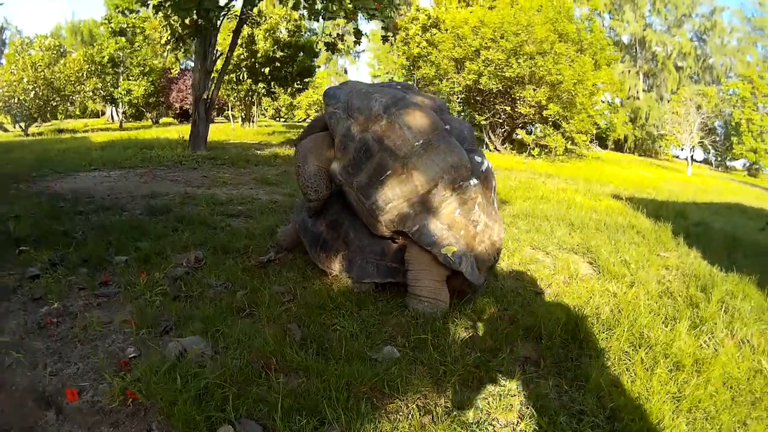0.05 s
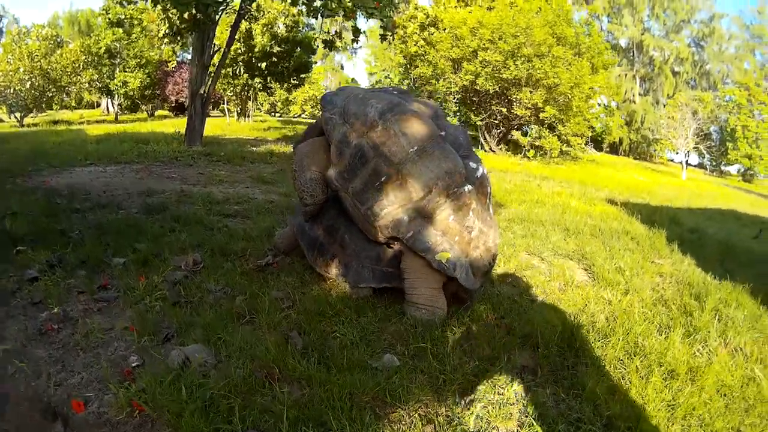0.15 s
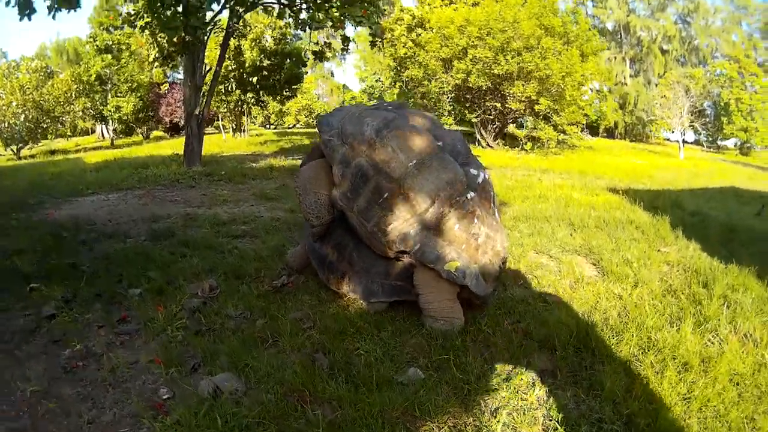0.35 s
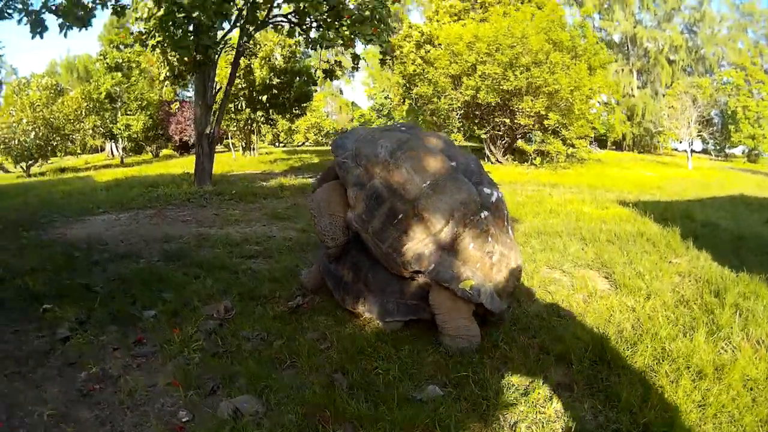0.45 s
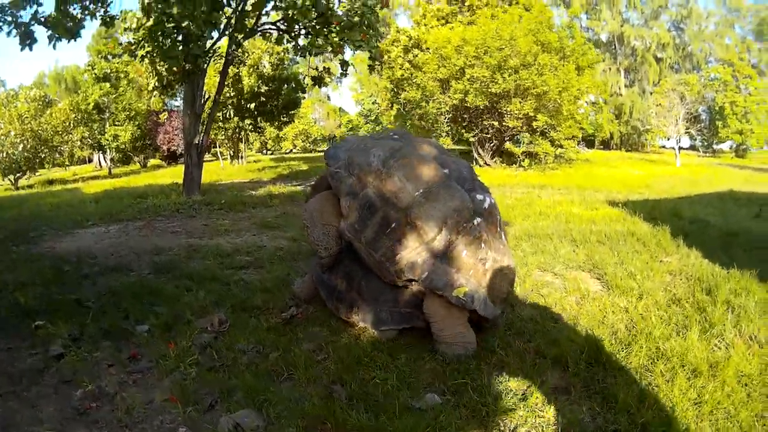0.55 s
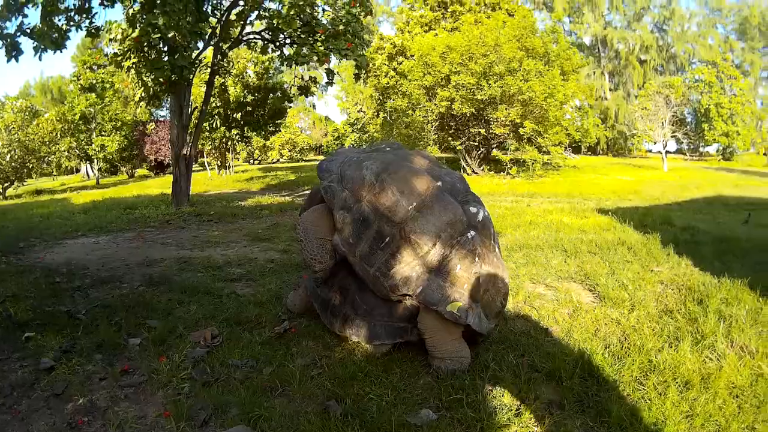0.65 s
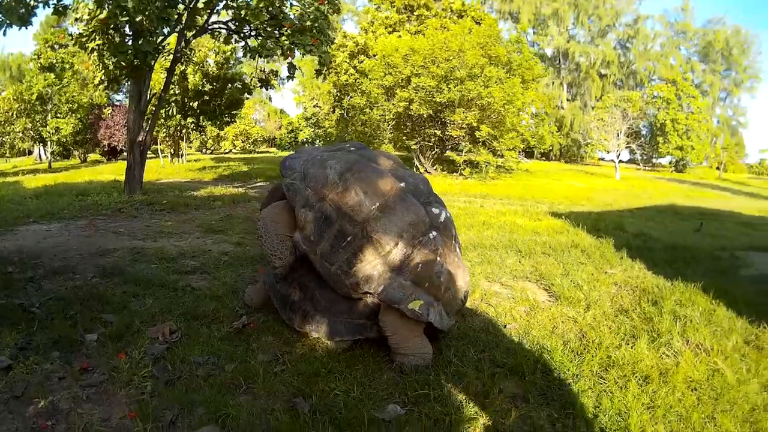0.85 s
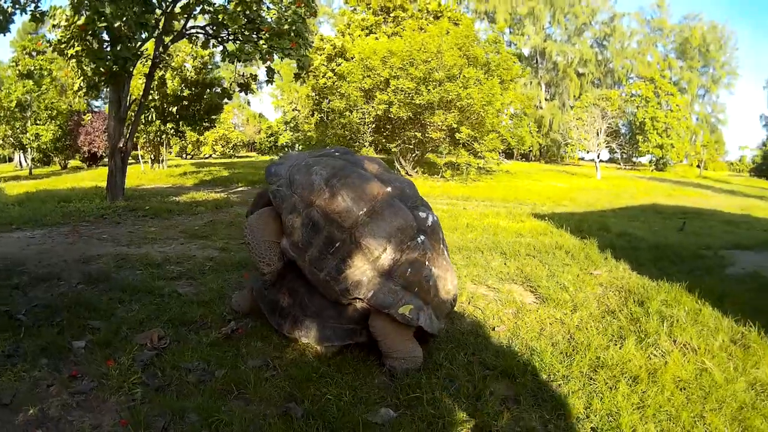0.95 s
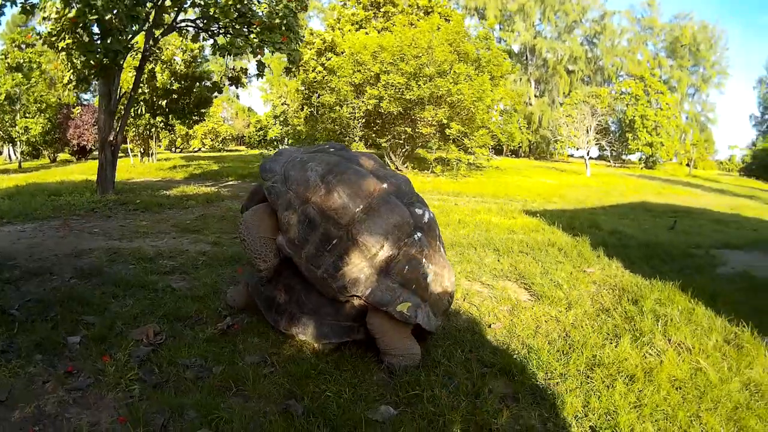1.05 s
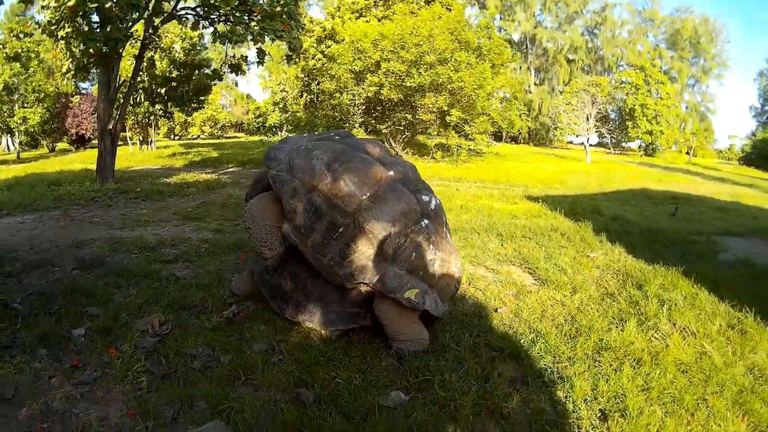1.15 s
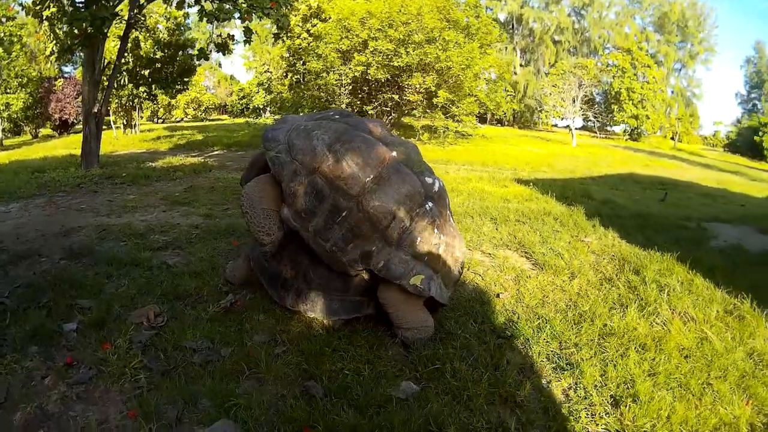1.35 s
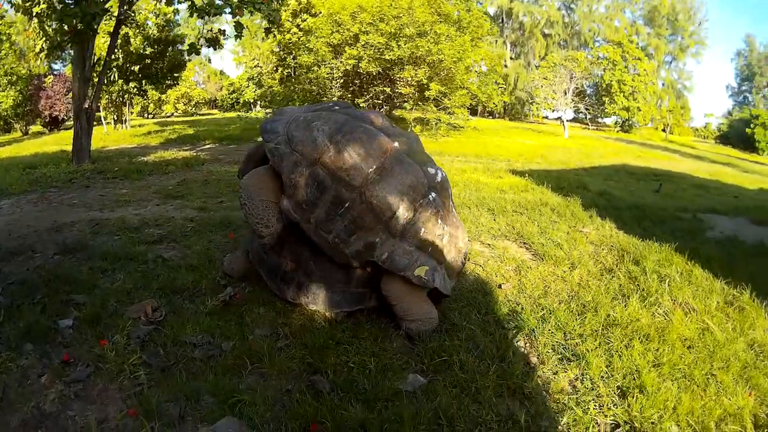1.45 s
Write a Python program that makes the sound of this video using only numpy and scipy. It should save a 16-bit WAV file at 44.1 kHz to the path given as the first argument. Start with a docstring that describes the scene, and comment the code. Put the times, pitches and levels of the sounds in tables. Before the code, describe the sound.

Hollow knocks and soft thumps from a handled camera, over faint outdoor rumble and hiss.

```python
"""Hollow knocks and soft thumps ring in one small body, most likely a hand-held camera's case and grip,
as it is carried over a lawn close to two tortoises. Each knock excites the damped modes of the case;
between knocks, faint friction of the grip drives the same modes. A soft squeak fades at the start.
Beneath lie the buffeting of the moving microphone, a low outdoor rumble and a steady hiss."""
import sys
import numpy as np
from scipy import signal
from scipy.fft import rfft, irfft
from scipy.io import wavfile

SR = 44100
rng = np.random.default_rng(int(sys.argv[2]) if len(sys.argv) > 2 else 0)


def to_wav(s):
    """Save 16-bit WAV."""
    ch = np.atleast_2d(s).T  # columns
    pcm = np.round(np.clip(ch, -1, 1) * 32767)  # PCM
    wavfile.write(sys.argv[1], SR, pcm.astype(np.int16))


N = 66150
TIME = np.arange(N) / SR


def knocks():
    """Impact excitation: a click with grit and a faint tail drives the case; soft contact cuts treble."""
    # blows: start_s, level_db, contact_hz, damping_db, bass_db, hollow_db, clack_db, edge_db
    hits = [(.0770, -41, 1410, 3, -4, -6.5, -1, 2), (.1160, -58.5, 900, 3.5, 7, 5.5, -5, 0),
            (0.285, -64, 4000, -4, -2, 4, 3, 0), (0.3317, -25, 2010, -0.5, -5, -7, 0.5, -9),
            (0.3367, -36, 2580, 2.5, -11, -9, -2.5, -3), (0.4408, -38, 2000, 0, -8.5, 0.5, -1, 4),
            (0.5411, -45.5, 696, 1, 4, 9.5, 0, -2), (.5560, -53, 900, 1.5, 10, 7.5, -4, 0),
            (0.5667, -45.5, 1600, -1, -2, -11, -1, 0), (0.5709, -28, 1750, 1.5, 6.5, 5, 4, 6.5),
            (.6000, -39.5, 1990, -1, -10, -15, 1.5, 4), (0.6127, -42, 1620, -2, 6, -2, 3, 5),
            (.6165, -35.5, 1450, 1.5, 0.5, -2, 1, 9), (.7980, -56.5, 700, 3, 3, 5, 3, 0)]
    out = np.zeros(N)
    for start_s, level_db, contact_hz, damping_db, *weights_db in hits:
        grit = from_db(-11) * dying_noise(start_s, t60_s=0.016)
        after_ring = from_db(-24) * dying_noise(start_s, t60_s=0.18)
        force = grit + after_ring
        force[int(start_s * SR)] += 1
        force = signal.sosfilt(signal.butter(2, contact_hz, fs=SR, output="sos"), force)
        out += from_db(level_db) * case(force, damping_db, *weights_db)
    return out


def case(drive, damping_db=0, bass_db=0, hollow_db=0, clack_db=0, edge_db=0):
    """Modal superposition: the point of impact weights each family of modes; the hand sets the damping."""
    # modes of the case: pitch_hz, level_db, t60_s
    modes = [(173.7, -11.5, 0.16), (304, -16.5, 0.06), (403.2, -14.5, 0.12), (563.5, -5, 0.063),
             (746.5, -15, 0.071), (870, -14, 0.03), (1157, -1, 0.032), (1387, -0.5, 0.021),
             (1796, -4, 0.03), (2021, -3, 0.014), (2556, -15, 0.025), (3107, -13, 0.026),
             (3670, -18, 0.019), (4455, -15.5, 0.015), (5540, -23.5, 0.012)]
    out = np.zeros(N)
    for k, (hz, level_db, t60_s) in enumerate(modes):
        families = [hz < 300, 300 <= hz < 1000, 1600 < hz < 2250, hz > 3950]
        weight_db = np.select(families, [bass_db, hollow_db, clack_db, edge_db])
        mode = ring(drive, hz, t60_s / from_db(damping_db))
        out += (-1) ** k * from_db(level_db + weight_db) * mode   # neighbours move in opposite directions
    low_cut_hz = 72   # the small case radiates little below this
    return signal.sosfilt(signal.butter(2, low_cut_hz, "high", fs=SR, output="sos"), out)


def ring(drive, hz, t60_s):
    """Damped resonator: a unit impulse starts a decaying sine of amplitude 1."""
    radius = from_db(-60 / (t60_s * SR))
    angle = 2 * np.pi * hz / SR
    return signal.lfilter([0, np.sin(angle)], [1, -2 * radius * np.cos(angle), radius ** 2], drive + 1e-18)


def thumps():
    """Gradual excitation: pushed gently, the lowest mode swells and fades."""
    # swelling tones: start_s, length_s, level_db, pitch_hz
    swells = [(.108, 0.041, -53.5, 168.4), (0.199, .036, -42, 167.7), (.284, 0.051, -43.5, 176.3),
              (.618, 0.025, -46.5, 184.5), (.645, 0.06, -60.5, 171), (0.792, 0.023, -56, 162),
              (1.012, 0.034, -55.5, 157.6), (1.145, .035, -56.5, 163.3)]
    out = np.zeros(N)
    for start_s, length_s, level_db, pitch_hz in swells:
        age = TIME - start_s
        envelope = np.sin(np.pi * np.clip(age / length_s, 0, 1)) ** 2
        out += from_db(level_db) * envelope * np.sin(2 * np.pi * pitch_hz * age)
    return out


def bumps():
    """Soft contact: a smooth pulse, with a shallow rebound on either side, holds only low frequencies."""
    # pushes of the hand on the grip: centre_s, width_s, level_db
    pushes = [(.1175, 0.0058, -52), (0.544, 0.0031, -44.5), (0.578, 0.0047, -37.5), (0.6234, 0.0031, -38),
              (0.746, 0.015, -50.5), (1.303, 0.0049, -55)]
    out = np.zeros(N)
    for centre_s, width_s, level_db in pushes:
        offset_squared = ((TIME - centre_s) / width_s) ** 2
        out -= from_db(level_db) * (1 - 2 * offset_squared) * np.exp(-offset_squared)
    return out


def rubbing(slips_per_s=2700, spread_db=4):
    """Stick-slip friction: dense tiny slips of the grip excite the modes of the case."""
    # course of the rubbing: time_s, level_db
    envelope = [(0, -67.5), (.10, -66), (.17, -77.5), (.26, -85), (.31, -63), (.39, -60), (.425, -62.5),
                (.48, -56.5), (.52, -67.5), (.63, -59.5), (.67, -73), (.80, -76), (.85, -68), (.90, -85),
                (.97, -76), (1.1, -85), (1.5, -89)]
    # spectrum of the friction force: frequency_hz, level_db
    spectrum = [(100, -15), (170, 0), (400, -14.5), (700, 1.5), (1200, -3.5), (2000, -3), (3000, -9),
                (5000, -14)]
    sizes = rng.standard_normal(N) * from_db(spread_db * rng.standard_normal(N))
    slips = sizes * (rng.random(N) < slips_per_s / SR)
    return level(envelope) * rms_one(case(colour(slips, spectrum)))


def squeak(pitch_hz=400.3, level_db=-53, t60_s=0.28):
    """Free decay: a soft squeak of the grip dies away exponentially at the start."""
    return from_db(level_db - 60 * TIME / t60_s) * np.sin(2 * np.pi * pitch_hz * TIME)


def buffeting():
    """Pressure fluctuation: the moving microphone is buffeted, mostly in the deepest bass."""
    # course of the buffeting: time_s, level_db
    envelope = [(0, -62.5), (.15, -59), (.28, -64.5), (.39, -58), (.5, -58), (.62, -59), (.75, -65),
                (.9, -61.5), (1.1, -70), (1.5, -74.5)]
    # its spectral density: frequency_hz, level_db
    spectrum = [(8, -3.5), (20, -0.5), (36, 2.5), (55, -14.5), (100, -18.5), (200, -35.5), (1000, -70)]
    return level(envelope) * colour(rng.standard_normal(N), spectrum)


def rumble():
    """Amplitude-modulated noise: a low outdoor rumble rises a little, then recedes."""
    # course of the rumble: time_s, level_db
    envelope = [(0, -62), (.25, -59.5), (.4, -58), (.62, -61.5), (.72, -65), (.9, -65.5), (1.1, -67.5),
                (1.32, -66.5), (1.5, -68)]
    # its spectral density: frequency_hz, level_db
    spectrum = [(20, -0.5), (60, -1.5), (110, -2.5), (170, 0), (230, -7.5), (350, -10), (450, -13.5),
                (700, -18.5), (1500, -29.5), (4000, -48)]
    return level(envelope) * colour(rng.standard_normal(N), spectrum)


def hiss(level_db=-71):
    """Stationary broadband noise: a nearly flat spectrum is heard as steady hiss."""
    # spectral density of the hiss: frequency_hz, level_db
    spectrum = [(50, 2), (500, 1), (1200, 2), (3000, -.5), (8000, -1.5), (14000, -1.5), (16000, -6)]
    return from_db(level_db) * colour(rng.standard_normal(N), spectrum)


def dying_noise(start_s, t60_s):
    """Exponential decay of a noise burst with a sudden onset; unit energy."""
    age = TIME - start_s
    burst = rng.standard_normal(N) * (age >= 0) * from_db(-60 * np.maximum(age, 0) / t60_s)
    return burst / np.sqrt(np.sum(burst ** 2))


def colour(noise, spectrum):
    """Spectral shaping through (frequency_hz, level_db) points; unit rms."""
    hz, db = np.transpose(spectrum)
    bins_hz = np.maximum(np.arange(N // 2 + 1) * SR / N, 1)
    gain = from_db(np.interp(np.log(bins_hz), np.log(hz), db))
    return rms_one(irfft(rfft(noise) * gain, N))


def level(points):
    """Amplitude envelope through (time_s, level_db) points."""
    return from_db(np.interp(TIME, *np.transpose(points)))


def from_db(db):
    """Decibels to amplitude ratio."""
    return 10 ** (np.asarray(db) / 20)


def rms_one(x):
    """Normalisation to unit rms."""
    return x / np.sqrt(np.mean(x ** 2) + 1e-20)


def scene():
    """Superposition: handling sounds and background add in one channel."""
    background = rumble() + hiss() + buffeting()
    return (rubbing() + knocks() + thumps() + bumps() + squeak() + background)[None]


def record(dry, cutoff_hz=15800):
    """Band limiting: a steep low-pass filter removes the highest treble."""
    return signal.sosfilt(signal.ellip(12, .1, 70, cutoff_hz, fs=SR, output="sos"), dry)


dry = scene()
out = record(dry)
to_wav(out)
```